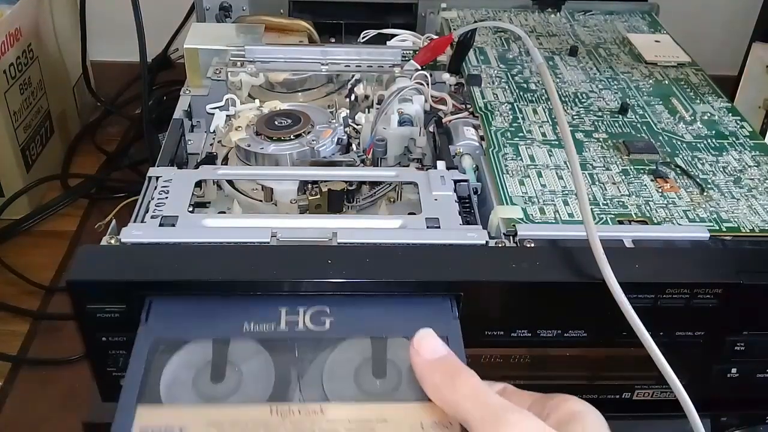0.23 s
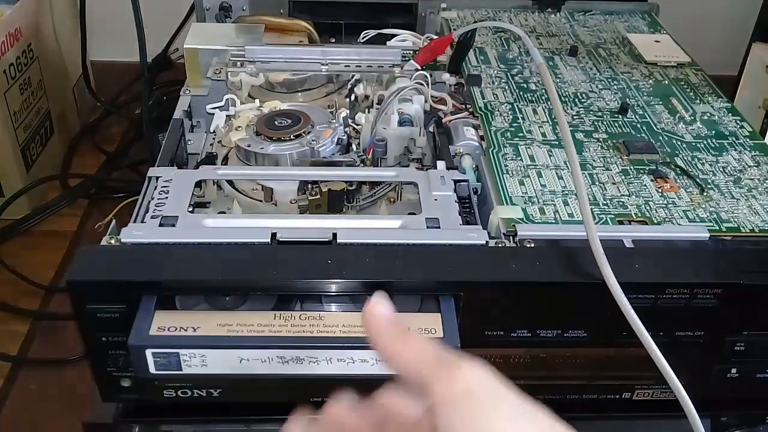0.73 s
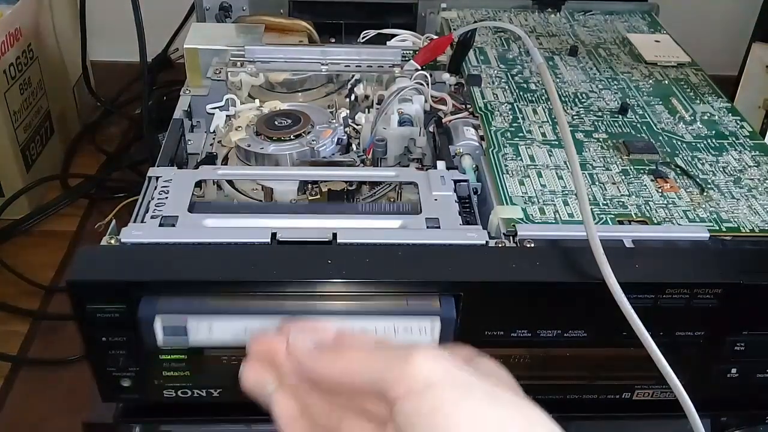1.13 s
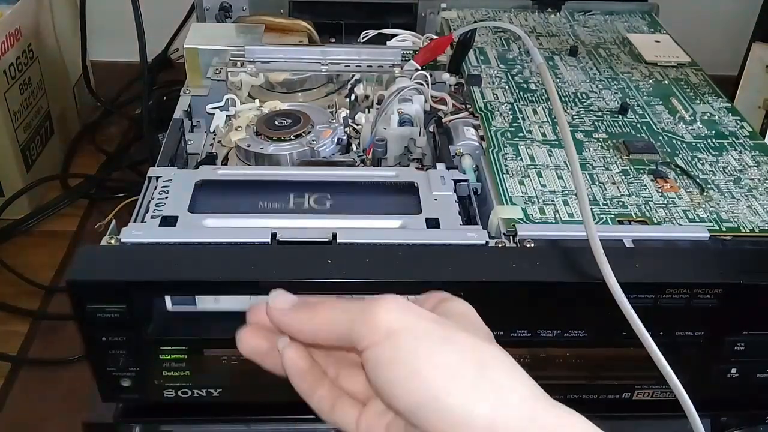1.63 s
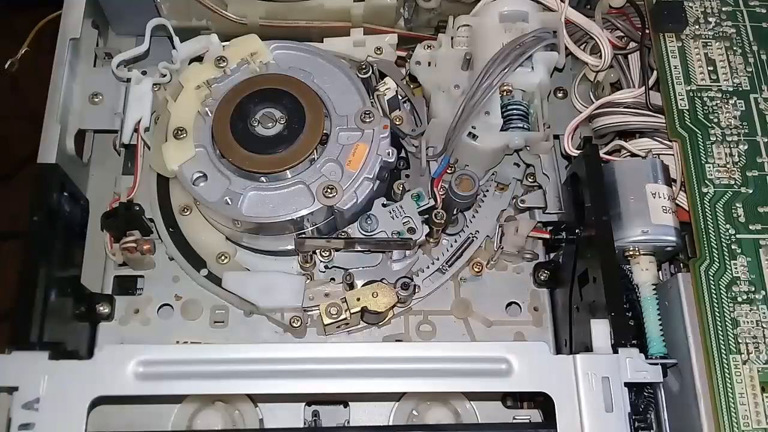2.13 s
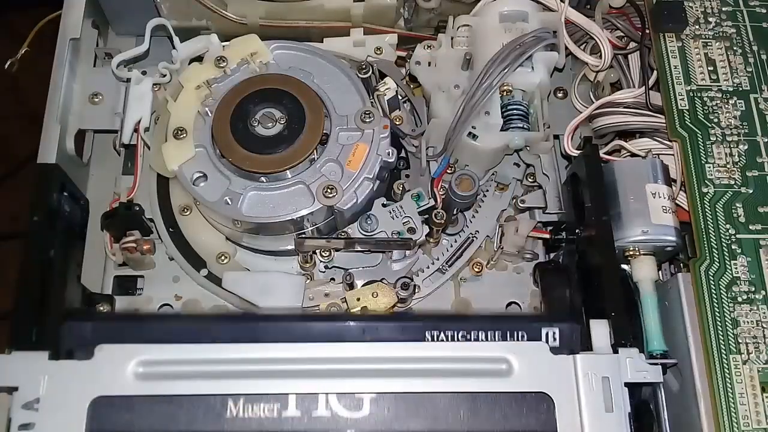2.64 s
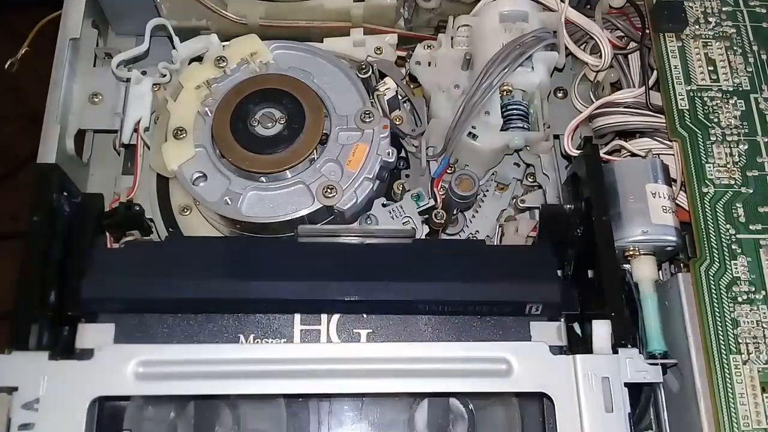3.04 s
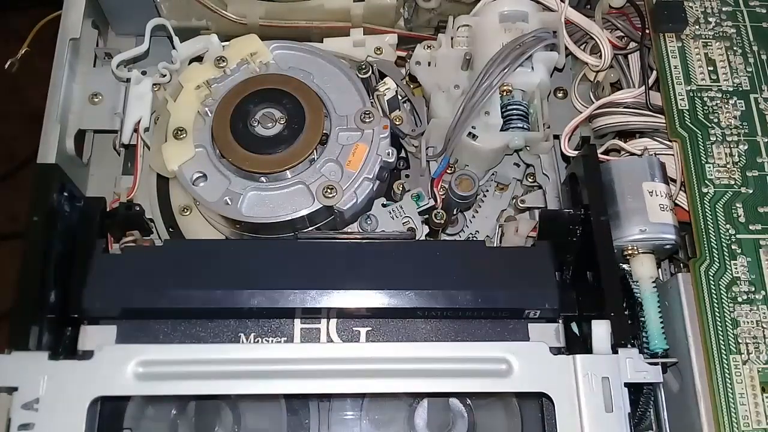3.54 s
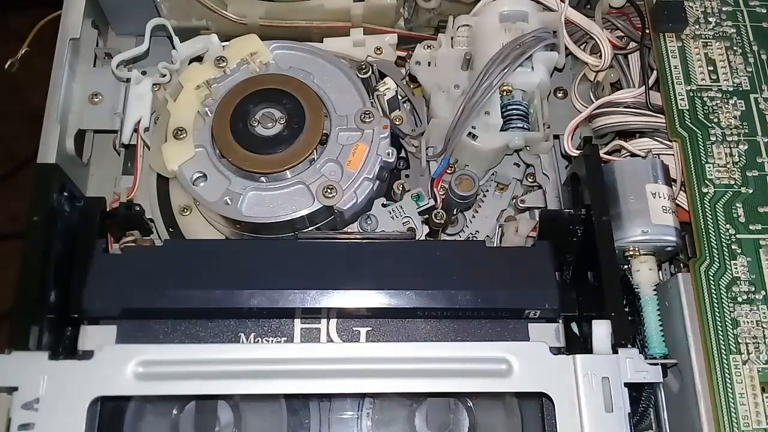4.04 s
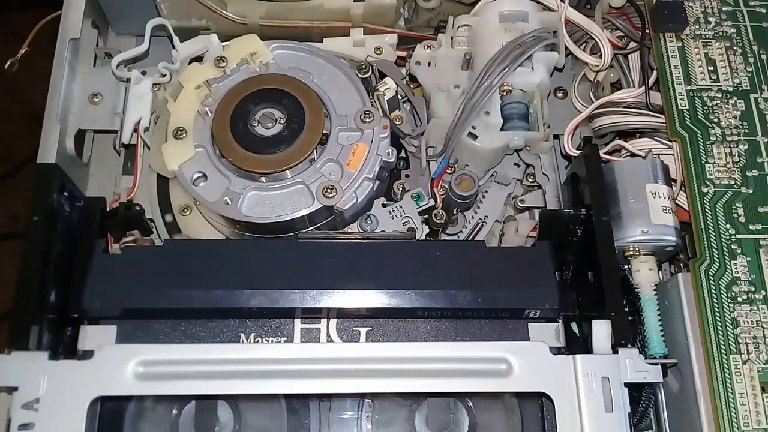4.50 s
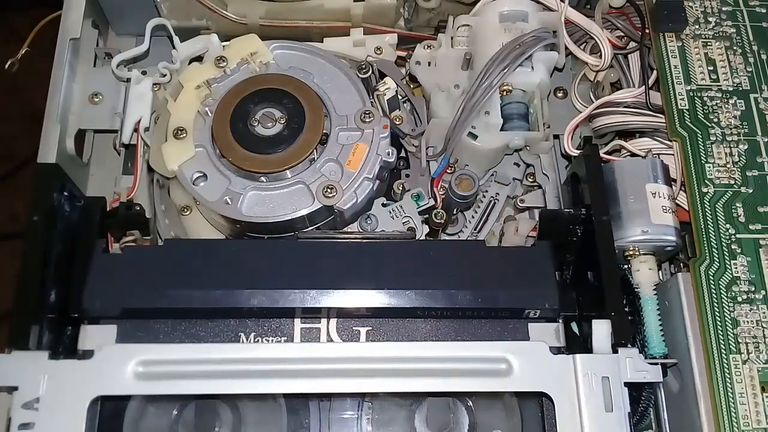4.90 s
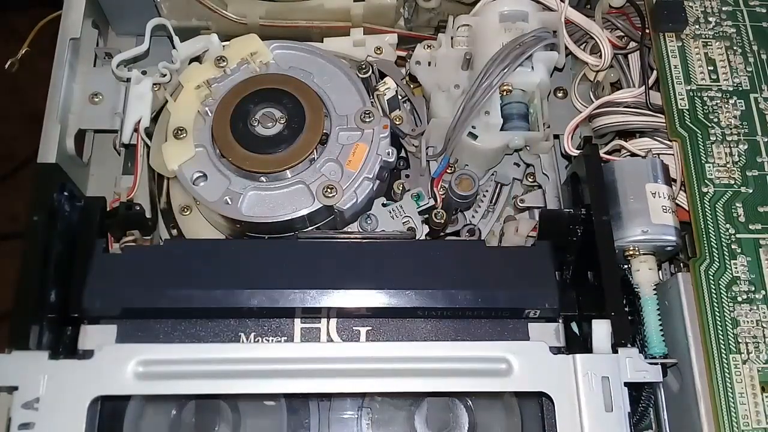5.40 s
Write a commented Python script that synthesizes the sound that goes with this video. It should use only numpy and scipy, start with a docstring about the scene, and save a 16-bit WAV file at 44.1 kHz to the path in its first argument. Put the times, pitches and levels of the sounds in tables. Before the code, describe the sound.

A hollow plastic video cassette scrapes and clicks into an open tape deck during the first half second, and a second push gives a sharp cluster of knocks at about 0.9 seconds. A lull follows, with only a faint thin whine around 1.5 seconds. A double click comes near 1.9 seconds. From 2.3 seconds the carriage pulls the cassette in, with sliding plastic and quick rattling clicks on a steel chassis, loudest around 2.8 seconds. The cassette seats with a hollow clunk at about 3.4 seconds. From 3.9 seconds to the end, around 5.6 seconds, a small motor threads the tape with a low hum, light hiss, rough gear whirr and a whine that comes and goes. Latches keep clicking, most sharply near 4.6 and 5.2 seconds. Everything is close to one microphone in a small room, over faint mains hum and room tone.

```python
"""A cassette slid by hand into an open tape deck, heard close on one microphone in a small room.
The carriage pulls it in and drops it on the spindles, then a geared motor threads the tape.
Plastic scrapes and knocks ring the hollow shell, latches click on the steel chassis, gears whirr
and a thin whine comes and goes. Mains hum and room tone lie under it all."""
import sys
import numpy as np
from scipy import signal
from scipy.fft import rfft, irfft, next_fast_len
from scipy.io import wavfile
from scipy.ndimage import map_coordinates

SR = 44100
rng = np.random.default_rng(int(sys.argv[2]) if len(sys.argv) > 2 else 0)


def put_to_file(sound):
    """Save the sound as 16-bit audio at rate SR, in the file named by the first command-line argument."""
    columns = np.atleast_2d(sound).T  # one column per channel
    safe = np.clip(columns, -1, 1)
    whole_steps = np.round(safe * 32767)
    wavfile.write(sys.argv[1], SR, whole_steps.astype(np.int16))


N = 249606

# the air of the room: f/Hz, relative level/dB
AIR_SPECTRUM = [(20, -39), (34, -3.5), (111, -4.5), (241, -17), (296, -20), (674, -22), (747, -25),
                (1250, -26), (1500, -28), (1750, -29), (6500, -41), (7390, -39), (13700, -40), (16000, -43)]
# mains hum, its fundamental: t/s, level/dB
MAINS_LEVELS = [(0, -63.5), (1.3, -70), (1.6, -63.5), (5.66, -66)]
# strokes of cassette and carriage: start/s, hold/s, shell/dB, scrape/dB, hiss/dB
STROKES = [(0.0, 0.044, -53.5, -52, -83), (0.08, 0.22, -54, -60.5, -75.5), (0.32, 0.11, -46.5, -47.5, -70),
           (0.9, 0.066, -48, -49, -65), (1.17, 0.047, -64, -69, -89), (2.02, 0.036, -75, -58.5, -95),
           (2.33, 0.064, -52, -54.5, -64.5), (2.42, 0.58, -57, -62.5, -72.5), (2.75, 0.35, -56, -56.5, -70),
           (3.17, 0.048, -57, -58.5, -71), (3.3, 0.21, -49, -71, -96), (3.88, 0.13, -62, -58, -89),
           (4.04, 0.5, -56, -59.5, -95), (4.6, 0.41, -68.5, -67, -95), (5.05, 0.51, -62, -62, -100),
           (5.63, .05, -63, -56, -95)]
# the hollow cassette: f/Hz, width/Hz, level/dB
SHELL_MODES = [(347.5, 35, -12.5), (596.4, 57.6, -4), (646, 31, -3.5), (753.4, 84, -1.5)]
# scraping plastic: f/Hz, relative level/dB
SCRAPE_SPECTRUM = [(530, -59), (900, -10), (1110, 1), (1240, -4.5), (1560, -4.5), (2730, -8), (9000, -25),
                   (11700, -30), (19800, -120)]
# high hiss of sliding plastic, from hand pushes and carriage: f/Hz, relative level/dB
SLIDE_HISS_SPECTRUM = [(2940, -88), (5000, -16), (5220, -77), (7380, 6), (9010, -11), (11200, 6),
                       (12600, -7), (14900, -8), (16000, -26)]
# contacts: t/s, click peak/dB, treble/dB re click, shell/dB re click, struck part's ring f/Hz
CONTACTS = [(0.018, -28.5, -8.5, -10, 4040), (0.067, -39.5, -12, -6.5, 2410), (0.109, -45.5, -24, 3, 2070),
            (0.162, -40, -17, -5.5, 2430), (0.267, -32.5, -17.5, -2, 1400), (0.286, -33, -17, 0.5, 1560),
            (0.305, -34.5, -27, -5, 2520), (0.331, -28.5, -32, -17, 1770), (0.387, -24, -16, -9, 2570),
            (0.446, -51, -23, 8, 1200), (0.873, -39, -14, -3, 2520), (0.897, -33.5, 1.5, -7, 2640),
            (0.91, -24, -5, -10, 4570), (0.932, -22.5, -13, -0.5, 1580), (0.955, -34, -9, -22, 1350),
            (1.143, -56, -7.5, 7.5, 1880), (1.199, -61, 2.5, 3, 2550), (1.514, -58, 2, -35, 4020),
            (1.93, -27, -31, -1.5, 1280), (1.942, -30, -10, -0.5, 3160), (2.028, -43, -12, -9, 1180),
            (2.055, -56, -4, 6.5, 1730), (2.099, -50, -2, 3, 4900), (2.302, -44.5, 1.5, 1, 3870),
            (2.329, -40, 1, -2, 2200), (2.41, -41, -12, 0, 2340), (2.491, -43.5, -22, 1, 1410),
            (2.527, -41.5, -24, -8, 1580), (2.56, -47, -22, -6, 1710), (2.597, -39, -11, -21, 1990),
            (2.657, -34, 1.5, -8.5, 6000), (2.694, -33, -7, 1, 1540), (2.716, -33, 0.5, -1, 2640),
            (2.746, -24.5, -12.5, 8, 2130), (2.761, -27.5, -23, 0.5, 2130), (2.773, -30.5, -4, 1, 2200),
            (2.797, -26.5, -7, -2, 3600), (2.814, -35, -7, -1, 2800), (2.829, -26, -25, 10, 2170),
            (2.839, -17, -7, -20, 2760), (2.995, -37, -13, -4.5, 3170), (3.006, -36, -8, -7.5, 4960),
            (3.044, -41.5, 8.5, -27, 5030), (3.058, -45, -6, 15.5, 1705), (3.076, -42, -14, 0, 1340),
            (3.095, -34, -8, -19, 1420), (3.17, -36.5, -13, -4.5, 2230), (3.19, -41.5, -18, 2, 2160),
            (3.225, -44.5, -10, 3.5, 1190), (3.277, -65, -17, 11, 2190), (3.412, -37, -10, -3.5, 3940),
            (3.429, -27, -3, -18, 4000), (3.438, -35, -17, 4, 2370), (3.469, -39.5, -6.5, 0, 1230),
            (3.504, -44.5, -11, 2, 2370), (3.589, -53.5, -28, 11, 1240), (3.672, -45, -27, 4, 2270),
            (3.694, -49, -17, 4, 2230), (3.875, -67, 10, -20, 1210), (4.033, -48.5, 5, -10, 4250),
            (4.086, -42.5, -5, -2.5, 1920), (4.126, -33.5, 0, -14, 5230), (4.179, -31, -15, -5.5, 2170),
            (4.272, -34, -10, 2.5, 2690), (4.29, -50.5, -1, 11, 2890), (4.326, -45.5, -11, 3.5, 2880),
            (4.411, -41, -3, -1, 2860), (4.453, -44, 1, 2.5, 2787), (4.638, -26, 0, -18.5, 2250),
            (4.732, -37.5, -3.5, -10, 2420), (5.119, -55.5, 15, -8, 4900), (5.126, -47, 9, -17, 4900),
            (5.162, -27.5, 4, -17.5, 2100), (5.219, -41, -11, -6, 2580), (5.322, -43.5, -3, -15, 2120),
            (5.365, -41, -7, -13, 3350), (5.447, -44.5, -5, -0.5, 1210), (5.58, -44.5, -16, -3, 3220)]
# the steel chassis: f/Hz, width/Hz, level/dB
CHASSIS_MODES = [(1030, 10.3, -12), (1348, 41, 9), (1700, 7.3, -10.5), (2230, 57, -21), (2630, 44, -12),
                 (3800, 48, -3), (3930, 140, 15), (4950, 48, -3)]
# the treble of a click: f/Hz, relative level/dB
SNAP_SPECTRUM = [(2650, -6), (4500, 6.5), (7820, 6.5), (10400, 3), (14700, -8), (16000, -8)]
# the struck wall flexes first, so the shell's ring builds up: f/Hz, width/Hz, level/dB
WALL_MODES = [(731, 120, -3)]
# the deck's case: f/Hz, width/Hz, level/dB
CASE_MODES = [(86, 30, -1.5), (128.5, 81, -3), (182, 50, -4), (359, 110, -1)]
# decay of the small room: f/Hz, t60/s
ROOM_DECAY = [(200, 0.24), (1000, 0.14), (4000, 0.14), (12000, 0.1)]
# a thin whine comes and goes: start/s, hold/s, level/dB
WHINE_SPELLS = [(1.42, 0.054, -81), (1.5, 0.15, -71), (1.8, 0.14, -81), (2.1, .2, -78.5),
                (3.52, 0.078, -67.5), (3.68, 0.056, -69.5), (3.875, .14, -60), (4.1, 0.11, -64),
                (5.03, 0.17, -65), (5.5, .2, -70)]
# the gears labour: start/s, hold/s, level/dB
STRAIN_SPELLS = [(3.33, 0.14, -61), (4.08, 0.42, -61), (4.6, 0.21, -67.5), (4.95, 0.34, -73),
                 (5.5, .2, -65)]
# the gearbox: f/Hz, width/Hz, level/dB
GEARBOX_MODES = [(976, 130, -5.5), (1304, 230, -6), (1604, 13.4, -3.5), (1990, 150, -8.5), (2350, 68, -16),
                 (2920, 44, -10), (3880, 100, -17)]
# the pinion sings: start/s, hold/s, level/dB
PINION_SPELLS = [(3.86, 0.17, -72), (4.3, 0.22, -64), (4.64, 0.12, -61), (4.86, 0.3, -64.5),
                 (5.4, 0.23, -62)]
# the motor can: f/Hz, width/Hz, level/dB
CAN_MODES = [(1460, 81, -21), (6740, 140, -25), (7800, 27, 27), (7250, 43, 25.5), (8200, 160, 24.5),
             (9660, 730, 22), (8700, 53, 7), (11400, 95, -39)]
# brush hiss: f/Hz, relative level/dB
BRUSH_SPECTRUM = [(760, -27), (1300, -4), (1540, -25), (1760, -33), (3040, -2.5), (5840, -6.5), (8000, 4),
                  (8610, -30), (9660, -10), (11800, -5), (16000, -35)]

LET_GO_S, SEATED_S, MOTOR_ON_S = 1.3, 3.4, 3.86  # hand lets go, cassette on the spindles, motor starts
TIME = np.arange(N) / SR


def amp(db):
    """Decibels to amplitude."""
    return 10 ** (np.asarray(db) / 20)


def unit_rms(x):
    """x brought to RMS 1."""
    return x / np.sqrt(np.mean(x ** 2) + 1e-20)


def unit_peak(x):
    """Each row brought to peak 1."""
    return x / np.abs(x).max(axis=1, keepdims=True)


def along(points, hz):
    """Read (f/Hz, value) points on a log frequency axis."""
    f, values = np.transpose(points)
    return np.interp(np.log(hz + 1), np.log(f + 1), values)


def wobble(rate):
    """A smooth random curve, rate knots a second."""
    return map_coordinates(rng.standard_normal(int(N * rate / SR) + 4), [TIME * rate])


def filtered(x, response):
    """x through a complex response of frequency."""
    size = next_fast_len(x.shape[-1] + 8192)
    return irfft(rfft(x, size) * response(np.fft.rfftfreq(size, 1 / SR)), size)[..., :x.shape[-1]]


def coloured(points):
    """Response read from (f/Hz, level/dB) points."""
    return lambda hz: amp(along(points, hz))


def resonant(modes):
    """Causal response of a sum of resonances, alternating in sign."""
    return lambda hz: sum((-1) ** k * amp(db) * 1j * hz * width / (f * f - hz * hz + 1j * hz * width)
                          for k, (f, width, db) in enumerate(modes))


def soft(hz, corner_hz):
    """Causal fourth-order roll-off: a yielding contact gives no treble."""
    return 1 / (1 + 1.4j * hz / corner_hz - (hz / corner_hz) ** 2) ** 2


def hollow(hz):
    """The shell's resonances, with little above the highest."""
    return resonant(SHELL_MODES)(hz) * soft(hz, corner_hz=990)


def gritty(response, rate, depth_db):
    """Filtered noise whose strength jumps about rate times a second, as when rough surfaces catch."""
    return unit_rms(filtered(rng.standard_normal(N) * amp(depth_db * wobble(rate)), response))


def spells(rows, rise_db_s, fall_db_s):
    """One gain curve per level column: each row swells, holds and fades; rows add in power."""
    start, hold, *levels = np.transpose(rows)[..., None]
    t = TIME[::32]
    shape_db = -rise_db_s * np.maximum(start - t, 0) - fall_db_s * np.maximum(t - start - hold, 0)
    return [np.interp(TIME, t, np.linalg.norm(amp(db + shape_db), axis=0)) for db in levels]


def dying(t, rise_s, t60):
    """A quick rise and an exponential decay."""
    return (1 - np.exp(-t / rise_s)) * amp(-60 * t / np.clip(t60, 0.003, 1))


def room_tone(mains_hz=50, air_db=-65.5):
    """Soft rumble and hiss around the microphone, with mains hum and its octave."""
    phase = 2 * np.pi * mains_hz * TIME
    hum_db = np.interp(TIME, *np.transpose(MAINS_LEVELS)) + 1.5 * wobble(5)
    hum = np.sqrt(2) * amp(hum_db) * (np.sin(phase) + 0.63 * np.sin(2 * phase))
    air = unit_rms(filtered(rng.standard_normal(N), coloured(AIR_SPECTRUM)))
    return hum + amp(air_db) * air


def sliding():
    """Plastic drags over guides: gritty friction shakes the shell and hisses."""
    shell_gain, scrape_gain, hiss_gain = spells(STROKES, rise_db_s=321, fall_db_s=256)
    shell = gritty(hollow, rate=90, depth_db=2.5)
    scrape = gritty(coloured(SCRAPE_SPECTRUM), rate=100, depth_db=1.5)
    hiss = gritty(coloured(SLIDE_HISS_SPECTRUM), rate=70, depth_db=1.0)
    return shell_gain * shell + scrape_gain * scrape + hiss_gain * hiss


def knocks(yield_s=0.002):
    """Each contact pushes shell and case; the plastic yields, then hard parts snap on the chassis."""
    when, click_db, treble_db, shell_db, part_hz = np.transpose(CONTACTS)[..., None]
    seated = when > SEATED_S
    force_db = click_db + 40  # re a -40 dB click
    t = np.arange(SR // 6) / SR
    since_snap = np.maximum(t - yield_s, 0)
    noise = rng.standard_normal((len(when), 4, len(t)))

    def rattle(rise_s, t60):
        """A fast decay over a weaker, longer one."""
        return dying(since_snap, rise_s, 0.65 * t60) + 0.35 * dying(since_snap, rise_s, t60)

    def steel(hz):
        """The struck part adds its own broad ring to the chassis and the colour of plastic."""
        chassis = 0.053 * resonant(CHASSIS_MODES)(hz)
        part = resonant([(part_hz, 0.3 * part_hz, 0)])(hz)
        plastic = 1.46 * coloured(SCRAPE_SPECTRUM)(hz)
        return (chassis + part + plastic) * soft(hz, corner_hz=5460)

    # hollow, gentle contacts rattle longer
    t60 = 0.071 * amp(0.4 * shell_db - 0.079 * force_db)
    click = unit_peak(filtered(noise[:, 0] * rattle(0.0007, t60), steel))
    treble = unit_peak(filtered(noise[:, 1] * rattle(0.001, 0.67 * t60), coloured(SNAP_SPECTRUM)))

    # share of the blow that rings all the shell's modes: damped by fingers, greatest on the spindles
    ring_share = np.select([when < LET_GO_S, seated], [0.14, 0.83], default=0.4)
    push = dying(t, 0.0001, t60=0.0012) + 0.062 * noise[:, 2] * dying(t, 0.00062, t60=0.15)
    shell = unit_peak(filtered(push, lambda hz: hollow(hz) * (ring_share + resonant(WALL_MODES)(hz))))

    shove = noise[:, 3] * dying(t, 0.0069, t60=0.13)
    thud = unit_peak(filtered(shove, lambda hz: resonant(CASE_MODES)(hz) * soft(hz, corner_hz=535)))
    # once the cassette is seated, contacts barely reach the case
    thud_db = -5.5 + 0.38 * shell_db - 0.52 * force_db - 11 * seated

    hits = amp(click_db) * (click + amp(treble_db) * treble + amp(shell_db) * shell + amp(thud_db) * thud)
    samples = np.round((when - yield_s) * SR).astype(int) + np.arange(len(t))
    return np.bincount(samples.ravel(), hits.ravel(), N + SR)[:N]


def room_echoes(x, delay_samples=200):
    """The room's answer, lows dying slowest; each quarter second gets its own tail."""
    out, step = np.zeros(N + SR), SR // 4
    for start in range(0, N, step):
        hz, t, noise = signal.stft(rng.standard_normal(step), SR, nperseg=256)
        decay = amp(-60 * t / along(ROOM_DECAY, hz)[:, None])
        _, tail = signal.istft(noise * decay, SR, nperseg=256)
        wet = signal.fftconvolve(x[start:start + step], tail / np.linalg.norm(tail))
        out[start + delay_samples:][:len(wet)] += wet
    return out[:N]


def whine(pitch_hz=1094):
    """One thin, slightly fuzzy note: its phase and strength wander."""
    gain, = spells(WHINE_SPELLS, rise_db_s=400, fall_db_s=198)
    phase = 2 * np.pi * pitch_hz * TIME + 1.02 * wobble(40)
    return gain * np.sqrt(2) * np.sin(phase) * amp(1.5 * wobble(25))


def gear_strain():
    """Labouring gear teeth whirr roughly in the gearbox resonances."""
    gain, = spells(STRAIN_SPELLS, rise_db_s=116, fall_db_s=85)
    return gain * gritty(lambda hz: np.abs(resonant(GEARBOX_MODES)(hz)) ** 1.8, rate=80, depth_db=3.0)


def spin_up(t, climb_db=30, settle_s=0.028):
    """The motor is silent until t = 0, then its level climbs and settles."""
    return (t > 0) * amp(-climb_db * np.exp(-np.maximum(t, 0) / settle_s))


def threading_motor(shaft_hz=76.3, sag_hz_s=1.7, teeth=16, level_db=-58.5):
    """The shaft hums, the pinion sings, brush hiss swells once a turn and rings the motor can."""
    running_s = TIME - MOTOR_ON_S
    turn = 2 * np.pi * np.cumsum(shaft_hz - sag_hz_s * running_s) / SR
    hum_db = level_db - 3.5 * running_s + 2.3 * wobble(13)
    hum_gain = amp(hum_db) * spin_up(running_s - 0.057)  # comes in just after the brushes
    hum = hum_gain * np.sqrt(2) * (np.sin(turn) + 0.17 * np.sin(2 * turn))

    tooth_note = np.sin(teeth * turn + 0.5 * wobble(60)) * amp(2 * wobble(45))
    upper_note = np.sin(20.7 * turn + 0.7 * wobble(60)) * amp(2.5 * wobble(45))
    pinion_gain, = spells(PINION_SPELLS, rise_db_s=310, fall_db_s=150)
    pinion = pinion_gain * (tooth_note + amp(-6) * upper_note)

    swell = 1 + 0.25 * np.cos(turn) + 0.16 * np.cos(2 * turn)
    brush = rng.standard_normal(N) * swell * amp(1.1 * wobble(35))
    can = resonant(CAN_MODES)
    hiss = unit_rms(filtered(brush, lambda hz: coloured(BRUSH_SPECTRUM)(hz) + 0.12 * np.abs(can(hz))))
    return hum + pinion + spin_up(running_s) * amp(level_db) * hiss


def scene():
    """Mono, close to the deck: everything arrives direct, and the knocks also echo in the room."""
    hits = knocks()
    machine = sliding() + gear_strain() + threading_motor() + whine()
    return (hits + amp(-5.0) * room_echoes(hits) + machine + room_tone())[None]


def record(dry, top_hz=15950):
    """The microphone channel passes nothing above its band limit."""
    return filtered(dry, lambda hz: hz < top_hz)


dry = scene()
out = record(dry)
put_to_file(out)
```